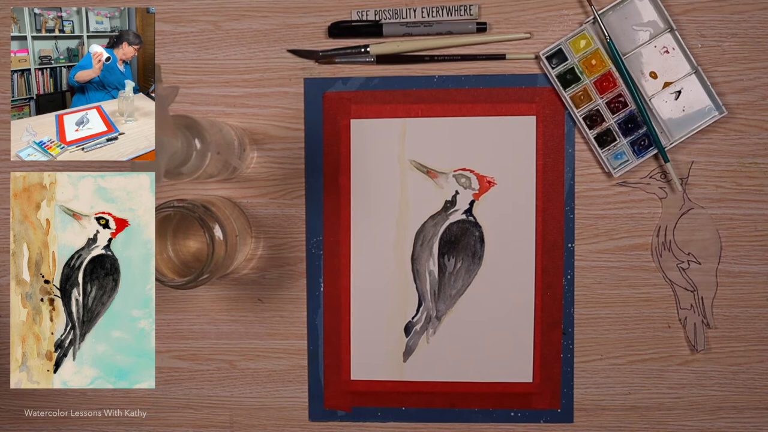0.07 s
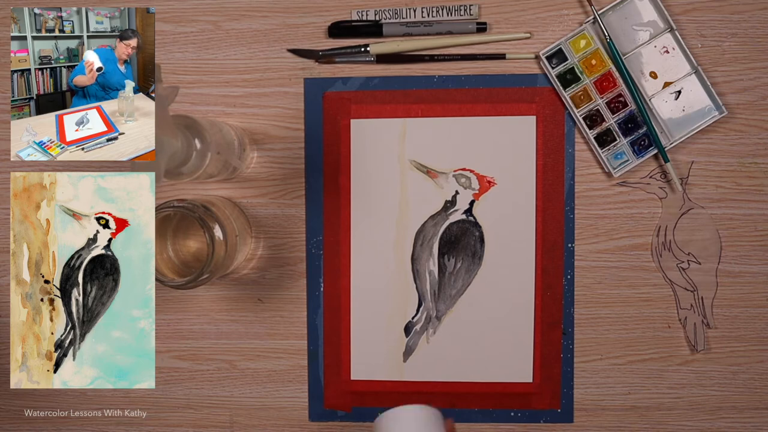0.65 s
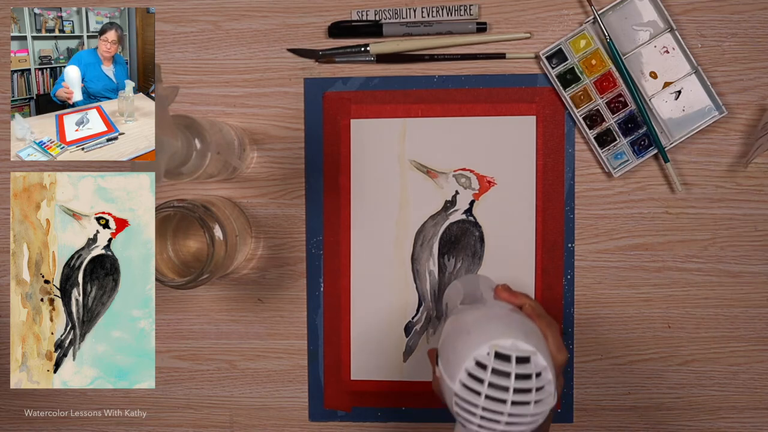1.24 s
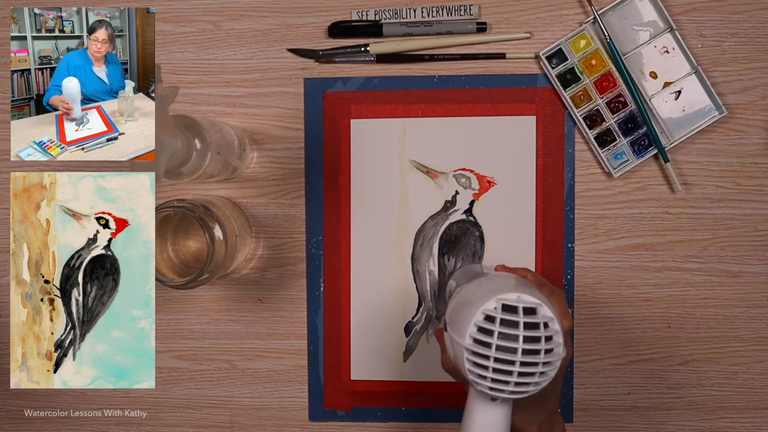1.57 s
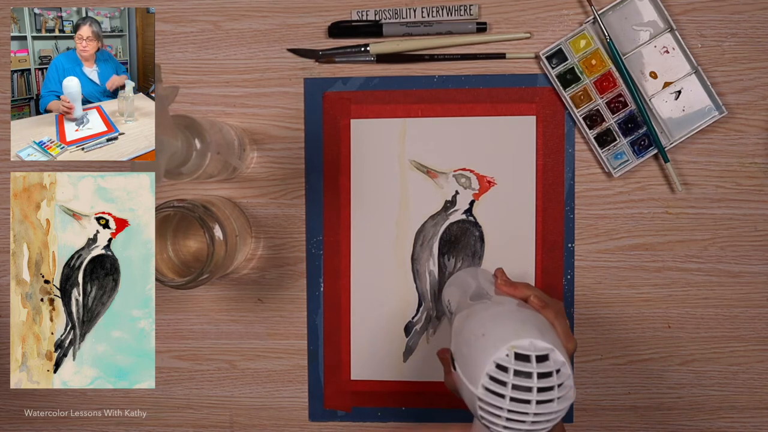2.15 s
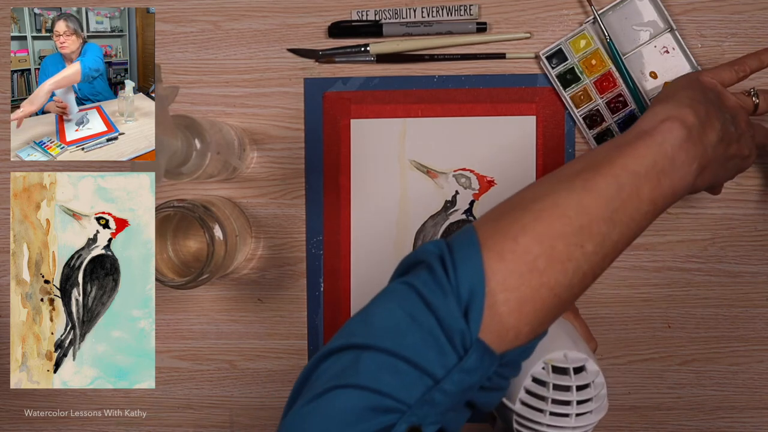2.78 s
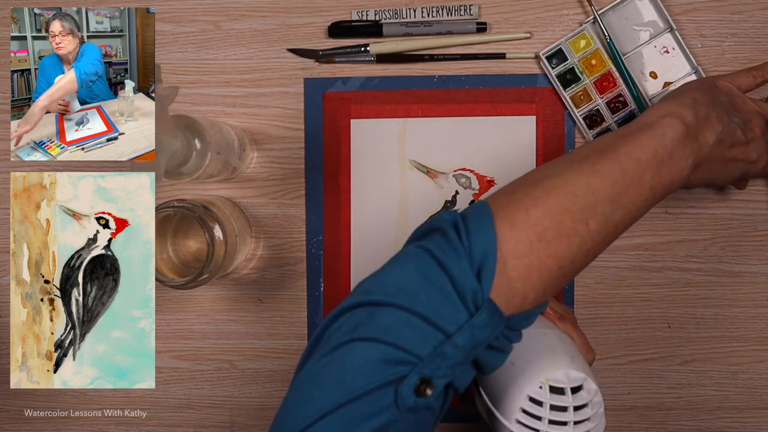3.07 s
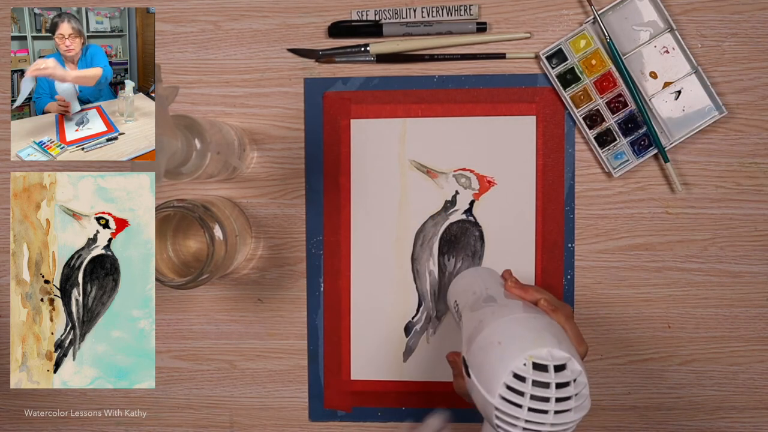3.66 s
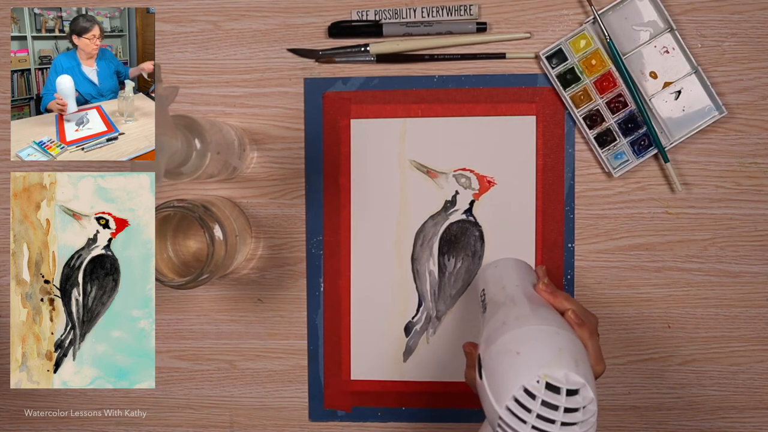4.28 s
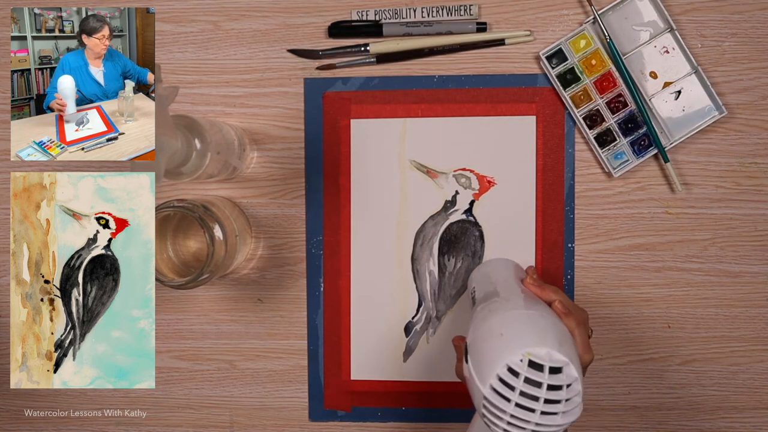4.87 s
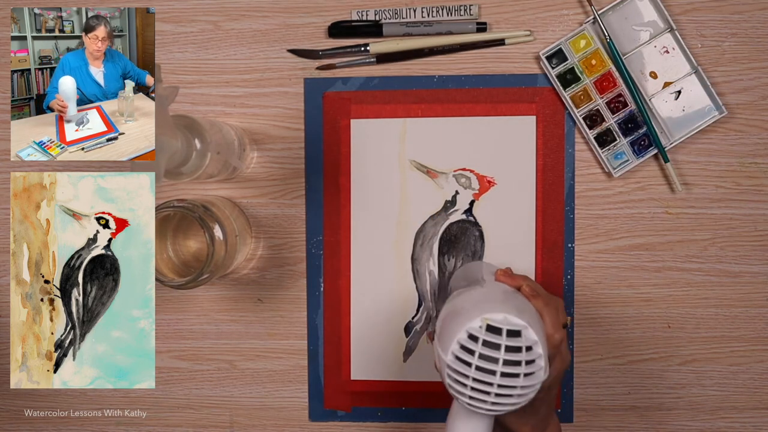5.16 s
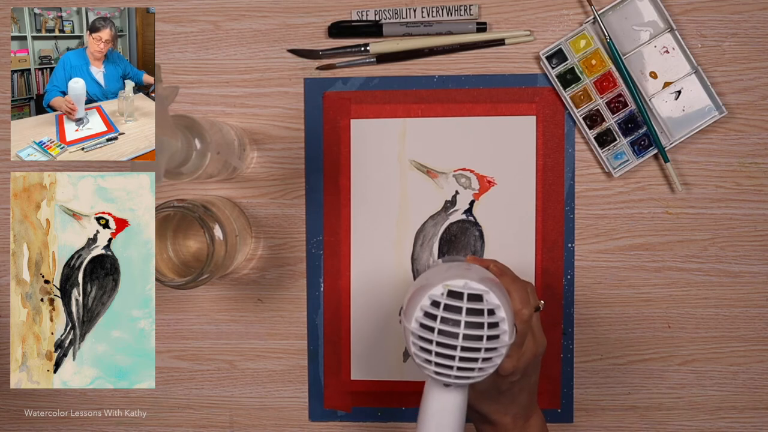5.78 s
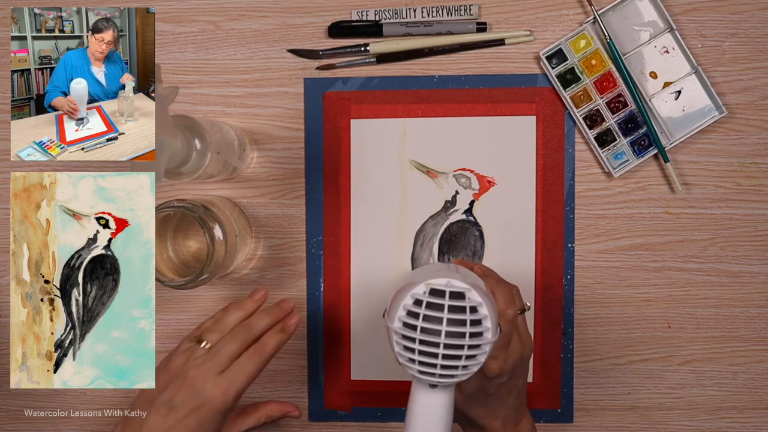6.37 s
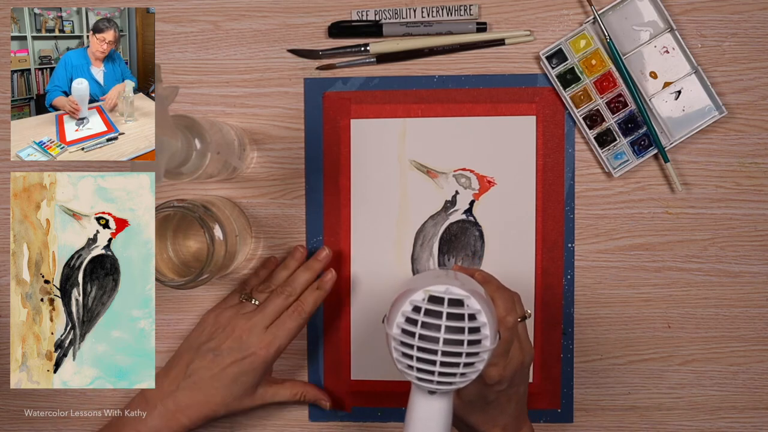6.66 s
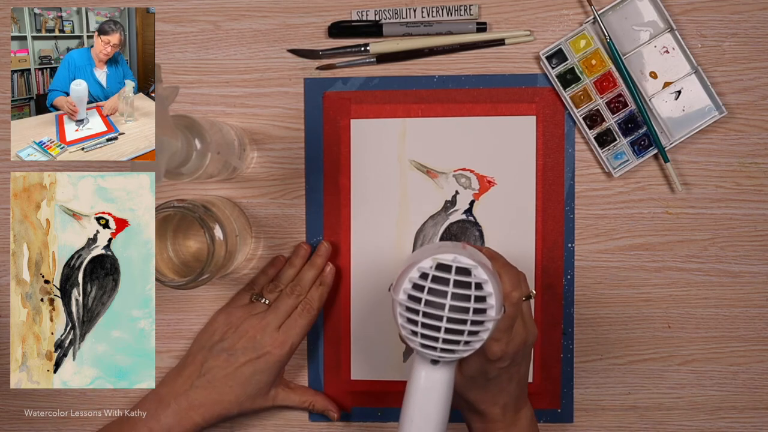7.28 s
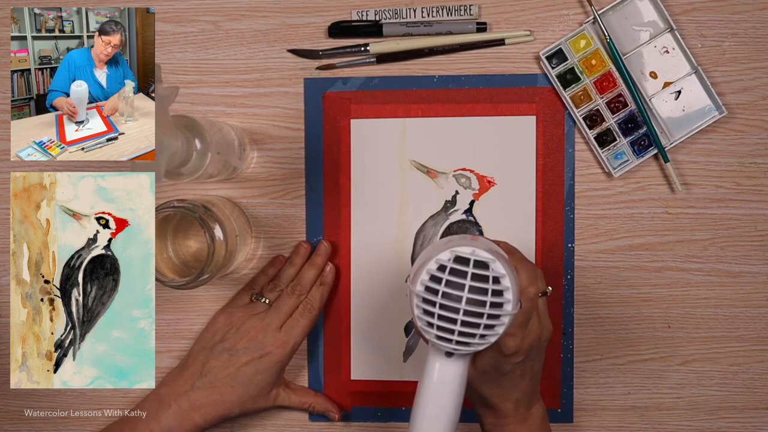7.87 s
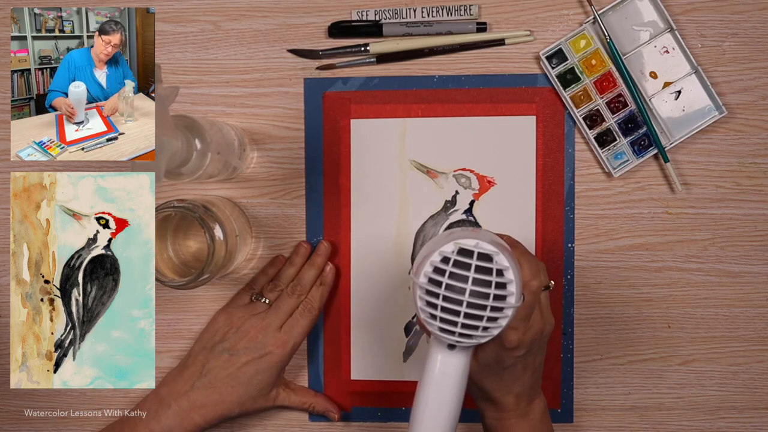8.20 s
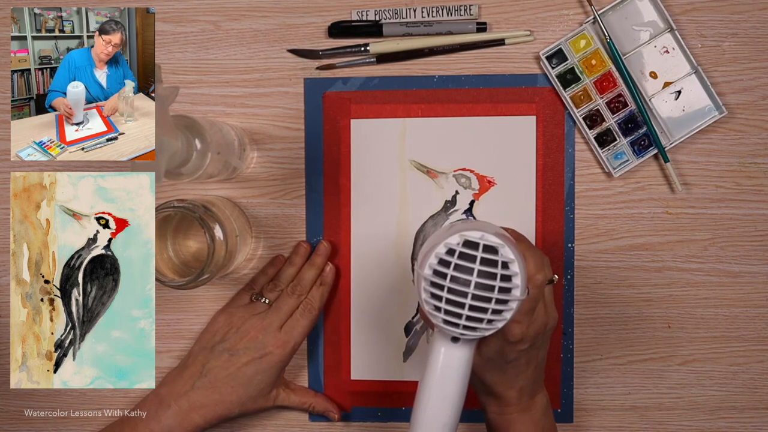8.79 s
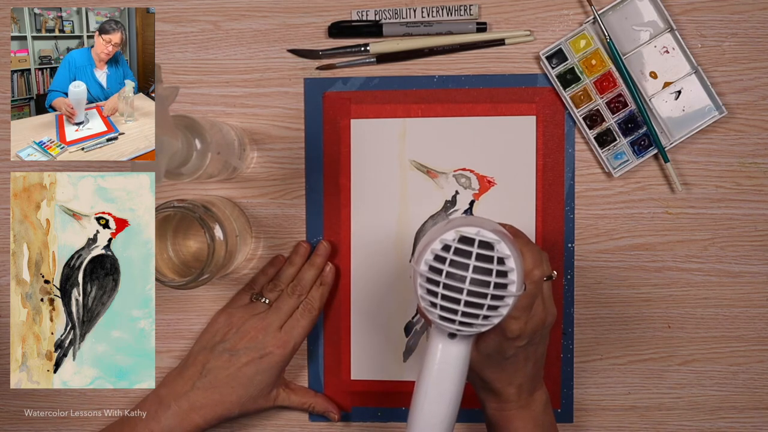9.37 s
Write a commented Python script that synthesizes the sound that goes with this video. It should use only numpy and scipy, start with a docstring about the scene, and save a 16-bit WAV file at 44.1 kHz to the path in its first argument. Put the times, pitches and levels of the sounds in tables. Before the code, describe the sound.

A hair dryer runs steadily with rushing air and a motor whine, growing louder as it comes close.

```python
"""Hair dryer over a table

A handheld dryer runs steadily, swung in from the side and held over a sheet of paper near one mono
microphone. Its five-blade fan whines on the shaft orders of a small mains-fed motor, and air roars
through the barrel. The grille's hiss changes colour as the dryer turns and an arm reaches past it."""
import sys
import numpy as np
from scipy import signal
from scipy.fft import rfft, irfft, next_fast_len
from scipy.io import wavfile
from scipy.ndimage import map_coordinates

SR = 44100
rng = np.random.default_rng(int(sys.argv[2]) if len(sys.argv) > 2 else 0)


def master_out(mix):
    """Clip the mix to full scale and print it as 16-bit PCM to the path in sys.argv[1]."""
    frames = np.transpose(np.atleast_2d(mix))
    ceiling = np.clip(frames, -1, 1)
    pcm = np.round(ceiling * 32767).astype(np.int16)
    wavfile.write(sys.argv[1], SR, pcm)


N = 425124


def whine(shaft, mains, shares, roar_db, hiss_db, blades=5):
    """Blade tone and shaft orders, throbbing with the rectified mains; the pose sets their balance."""
    # The loudest tones, as multiples of the shaft speed.
    strong_orders = (4, 5, 6, 8)
    # How they beam at the microphone. Each row, one per pose: orders 4, 5, 6, 8 in dB against the roar.
    beams = [(3.1, 13.4, -8, 2.5), (.2, 10.3, -9, -1), (3.1, 9.2, -8, -2.5), (4.8, 7.2, -10, -1),
             (4.1, 11.5, -11, -1), (4.8, 10.8, -6, -5)]
    # Weaker tones out of the barrel. Each row: shaft order, level in dB against the roar.
    barrel_orders = [(2, -20.5), (3, -18), (7, -12.5), (10, -12.5), (11, -20), (12, -13.5), (15, -29),
                     (16, -26)]
    # Thin motor tones out of the grille. Each row: shaft order, level in dB against the hiss.
    motor_orders = [(19, -23), (20, -16.5), (24, -26), (26, -23), (37, -29)]
    # Tones beside the blade tone. Each row: offset in multiples of the ripple, dB against the roar.
    sidebands = [(-1, -20), (1, -7)]
    beams_db = np.transpose(beams) @ shares
    strong = sum(amp(db + fading(k)) * tone(k * shaft, unrest=0.063)
                 for k, db in zip(strong_orders, beams_db))
    weak = sum(amp(db) * tone(round(k) * shaft, unrest=0.13) for k, db in barrel_orders)
    thin = sum(amp(db) * tone(round(k) * shaft, unrest=0.13) for k, db in motor_orders)
    throb = sum(amp(db) * tone(blades * shaft + round(k) * mains, unrest=0.093) for k, db in sidebands)
    return amp(roar_db) * (strong + throb + weak) + amp(hiss_db) * thin


def rotor(flutter_hz, flutter_rate):
    """Angle of the shaft, whose speed trembles under the load of the air."""
    # Motor speed. Each row: time in seconds, turns a second.
    motor_speed = [(0, 168.25), (.6, 168.3), (1.5, 168.65), (5, 168.65), (6, 168.95), (6.8, 168.75),
                   (8, 168.95), (9.64, 169.0)]
    speed, = curves(motor_speed)
    return 2 * np.pi * np.cumsum(speed + flutter_hz * wobble(flutter_rate)) / SR


def tone(angle, unrest):
    """One tone; eddies in the intake shake its strength and phase."""
    phase = angle + rng.uniform(0, 2 * np.pi)
    in_phase = (1 + unrest * wobble(40)) * np.cos(phase)
    quadrature = unrest * wobble(40) * np.sin(phase)
    return np.sqrt(2) * (in_phase + quadrature)


def fading(order, sway_db=0.73, sway_rate=6):
    """Change in dB of one tone as the unsteady hand carries it through the room's standing waves."""
    # Passes through a node. Each row: centre in seconds, half length in seconds, order, depth in dB.
    nodes = [(0, 1, 5, -6), (.55, .1, 5, -2.5), (.62, 0.18, 4, -7), (3.447, 0.13, 8, -4.5),
             (4.65, 0.36, 8, -3), (4.755, 0.3, 4, -5), (5.35, 0.21, 4, -8), (6.694, 0.45, 4, -4.5)]
    t = np.arange(N) / SR
    dips_db = sum(db * np.exp(-((t - centre) / half) ** 2)
                  for centre, half, k, db in nodes if round(k) == order)
    return dips_db + sway_db * wobble(sway_rate)


def roar(roar_db):
    """Turbulent air coloured by the barrel."""
    # Spectrum of the barrel air. Each row: frequency in Hz, relative density in dB.
    barrel = [(25, -57), (60, -49), (95, -37), (150, -25.5), (240, -19.5), (310, -15), (405, -12.5),
              (500, -3), (620, 1), (900, 3), (1080, -2.5), (1400, -5.5), (1800, -15), (2300, -34),
              (4000, -68)]
    gain = amp(roar_db - 2.22 + 0.42 * wobble(12))
    return gain * rush(barrel, band_hz=(380, 630), room_db=-21, room_t60=0.6)


def hiss(shaft, mains, shares, hiss_db):
    """Air tearing at the grille, pulsing slightly with each turn of the fan and with the mains."""
    # The grille from the microphone, pose by pose. Each row: frequency in Hz, relative density in dB.
    aside = [(700, -27), (1500, 2), (2050, 4), (2400, -3.5), (2850, -2.5), (3220, -0.5), (3650, -5.5),
             (4600, -4), (6200, -6.5), (7400, -8.5), (8800, -12.5), (12000, -16), (14800, -24),
             (15600, -27)]
    tilted = [(700, -31), (1500, 5), (1850, 11.5), (2300, 3), (2700, 5.5), (3300, 5), (3850, -2),
              (4600, -3), (5400, 0), (6200, 2.5), (7600, -2), (11500, -5.5), (15500, -17)]
    beside_arm = [(700, -38), (1700, -1.5), (2300, -9), (2900, -4.5), (3300, -1.5), (3700, -4),
                  (4500, -1.5), (5300, -2.5), (6400, -1.5), (7600, -6.5), (9700, -10), (12100, -13),
                  (14000, -21), (15500, -20)]
    behind_arm = [(700, -27), (1700, -7), (2250, -14), (2900, -10), (3200, 1), (3700, -3.5), (4400, 1.5),
                  (5300, -3), (6900, -5), (7600, -10.5), (8800, -13), (9800, -9), (13800, -19),
                  (15500, -24)]
    leaning = [(700, -20), (1850, 9), (2300, 0), (2700, 3.5), (3900, -2), (4600, 0.5), (5600, -2.5),
               (7300, -4.5), (9000, -3), (10500, -8.5), (12000, -6.5), (13500, -13.5), (15500, -18)]
    upright = [(700, -16), (1650, 8.5), (2350, -4), (2850, 0), (3120, 0.5), (3450, -4.5), (4150, -3.5),
               (4850, 0), (6300, -.5), (7550, -4.5), (9000, -2.5), (10500, -6.5), (13600, -15.5),
               (15500, -19)]
    # Housing resonances, heard in every pose. Each row: centre in Hz, width in Hz, lift in dB.
    housing = [(4650, 650, 1.5), (6060, 240, 2.5), (8230, 310, 3.5), (9460, 780, 1.5), (11540, 410, 1)]
    poses = [aside, tilted, beside_arm, behind_arm, leaning, upright]
    air = sum(np.sqrt(share) * rush(pose, band_hz=(3000, 15000), room_db=-8, room_t60=0.11, peaks=housing)
              for pose, share in zip(poses, shares))
    air = table_bounce(air + swells(), strength=0.13, delay_ms=0.824, sway_ms=0.038)
    pulsing = 1 + 0.035 * np.cos(shaft) + 0.027 * np.cos(2 * shaft) + 0.022 * np.cos(mains)
    flutter = 1 + 0.031 * tone(2 * np.pi * 48 * np.arange(N) / SR, unrest=0.26)
    return amp(hiss_db - 0.32 + 0.22 * wobble(25)) * pulsing * flutter * air


def swells():
    """Hissing resonances of the grille that sweep across the microphone as the dryer is aimed."""
    # Each row: start, peak and end in seconds, centre and width in Hz, level in dB against the hiss.
    resonances = [(0.775, .95, 1.4, 12100, 2200, -11), (1.066, 1.6, 2.4, 4560, 300, -9.5),
                  (1.62, 2.399, 2.6, 12100, 1400, -17), (2.0, 2.35, 2.3, 8800, 1000, -9),
                  (3.404, 3.693, 3.95, 7800, 2600, -2.5), (3.6, 3.8, 4, 14700, 1500, -16),
                  (3.7, 4.25, 5.1, 10150, 2010, -6), (4.8, 5.3, 6.8, 12000, 700, -15),
                  (4.6, 5.3, 8.6, 3000, 700, -8.5), (6.8, 7.3, 19.4, 3120, 45, -11),
                  (.25, .7, 1.5, 3240, 200, -10)]
    t = np.arange(N) / SR
    out = np.zeros(N)
    for start, peak, end, hz, width, db in resonances:
        edges = np.clip([hz - width / 2, hz + width / 2], 100, SR / 2 - 100)
        bandpass = signal.butter(2, edges, "bandpass", fs=SR, output="sos")
        band = signal.sosfilt(bandpass, rng.standard_normal(N))
        envelope = np.sqrt(np.interp(t, [start, peak, end], [0, 1, 0]))
        out += amp(db) * envelope * band / band.std()
    return out


def table_bounce(x, strength, delay_ms, sway_ms):
    """Adds the reflection off the table top; its path shifts with the hand, so the hiss sounds phasey."""
    delay = (delay_ms + sway_ms * wobble(1.507)) * SR / 1000
    bounce = map_coordinates(x, [np.arange(N) - delay])
    return (x + strength * bounce) / np.hypot(1, strength)


def hum(shaft, mains, roar_db, near_db=-58, proximity=1.52):
    """Shaft imbalance and mains hum; bass grows faster than the roar as the dryer nears the microphone."""
    level_db = near_db + proximity * (roar_db - near_db)
    return amp(level_db) * (amp(-24) * tone(shaft, unrest=0.2) + amp(-42.5) * tone(mains, unrest=0.1))


def pose_shares():
    """Share of each pose, or way of holding the dryer, at every sample; a turn fades the earlier out."""
    # Turns of the hand from one pose to the next. Each row: start and end in seconds.
    turns = [(0.758, 1.07), (2.0, 2.33), (2.6, 3.2), (3.4, 4.1), (5.8, 6.1)]
    t = np.arange(N) / SR
    shares = [np.ones(N)]
    for start, end in turns:
        turned = np.clip((t - start) / (end - start), 0, 1)
        shares = [share * (1 - turned) for share in shares] + [turned]
    return np.array(shares)


def rush(spectrum, band_hz, room_db, room_t60, peaks=()):
    """Air noise with a (Hz, dB) spectrum, lifted at resonances and rippled by the room; rms 1 in band."""
    size = next_fast_len(N + 8192)
    hz = np.fft.rfftfreq(size, 1 / SR)
    knots_hz, db = np.transpose(spectrum)
    lift_db = sum(lift / (1 + (2 * (hz - centre) / width) ** 2) for centre, width, lift in peaks)
    gain = amp(np.interp(np.log(hz + 1), np.log(knots_hz), db) + lift_db)
    gain *= np.minimum(hz / knots_hz[0], 1) ** 2  # bass roll-off
    t = np.arange(SR // 4) / SR
    room_tail = rng.standard_normal(len(t)) * amp(-60 * t / room_t60)
    gain *= np.abs(1 + amp(room_db) * rfft(room_tail / np.linalg.norm(room_tail), size))
    gain /= np.sqrt(np.mean(gain ** 2 * (hz > band_hz[0]) * (hz < band_hz[1])))
    return irfft(rfft(rng.standard_normal(size)) * gain, size)[:N]


def amp(db):
    """Decibels to gain."""
    return 10 ** (np.asarray(db) / 20)


def curves(rows):
    """One value per sample for each column after the time."""
    times, *columns = np.transpose(rows)
    return [np.interp(np.arange(N) / SR, times, column) for column in columns]


def wobble(rate):
    """A smooth random curve, rate knots a second."""
    return map_coordinates(rng.standard_normal(int(N * rate / SR) + 4), [np.arange(N) * rate / SR])


def scene():
    """Whine, hum, roar and hiss of the one dryer, in mono."""
    # Air flow at the microphone. Each row: time in seconds, barrel roar and grille hiss in relative dB.
    air_flow = [(0, -72, -71), (0.35, -73, -71.5), (0.75, -72, -71), (1.1, -61.5, -61), (2.0, -61, -60.5),
                (2.3, -58.5, -54.5), (2.8, -57, -53.5), (3.2, -56, -51.5), (3.5, -57.5, -54.5),
                (4.0, -63, -61), (4.75, -68, -65.5), (5.25, -65, -64), (6.0, -66, -65.1), (6.7, -63, -61.5),
                (7.0, -64, -63.1), (7.5, -62.5, -61.5), (8.4, -65, -64.5), (9.64, -65.5, -64.1)]
    roar_db, hiss_db = curves(air_flow)
    shares = pose_shares()
    shaft = rotor(flutter_hz=0.082, flutter_rate=14)
    mains = 2 * np.pi * 120 * np.arange(N) / SR  # phase of the 120 Hz supply ripple
    tones = whine(shaft, mains, shares, roar_db, hiss_db) + hum(shaft, mains, roar_db)
    return (tones + roar(roar_db) + hiss(shaft, mains, shares, hiss_db))[None]


def record(dry):
    """The recorder keeps nothing above its band limit."""
    top_hz = 15720
    size = next_fast_len(N + 8192)
    passband = np.fft.rfftfreq(size, 1 / SR) < top_hz
    return irfft(rfft(dry, size) * passband, size)[..., :N]


dry = scene()
out = record(dry)
master_out(out)
```